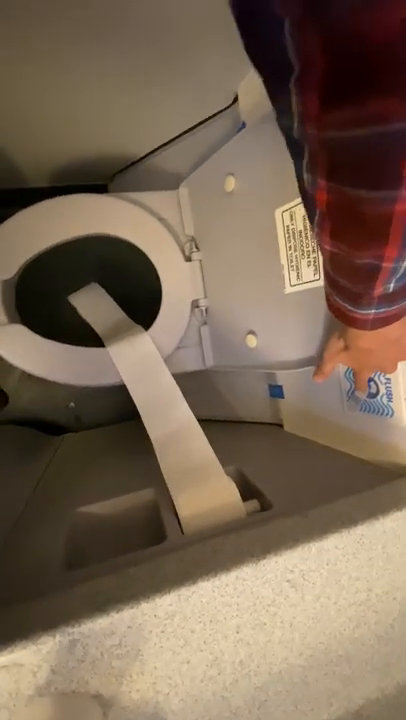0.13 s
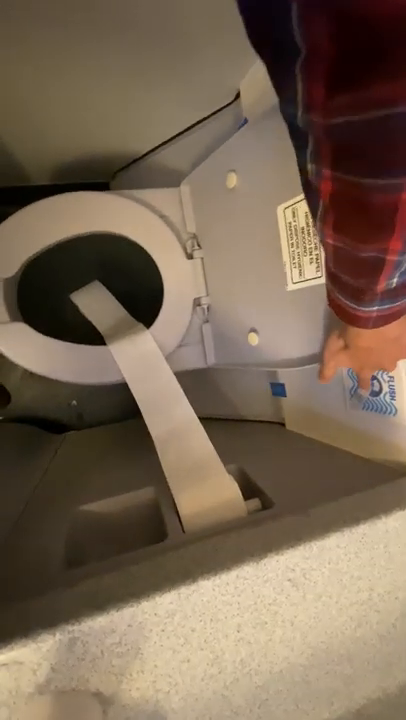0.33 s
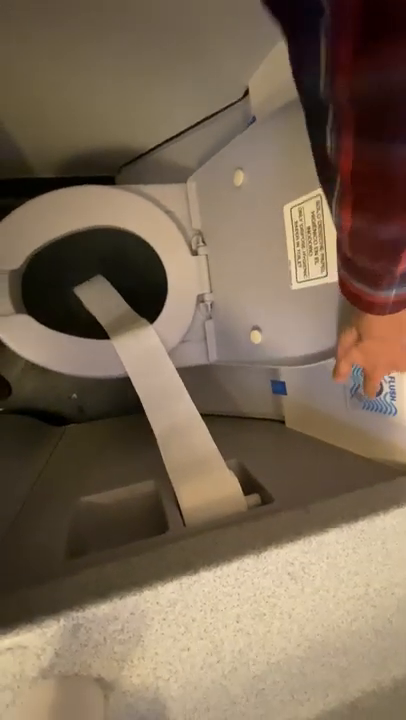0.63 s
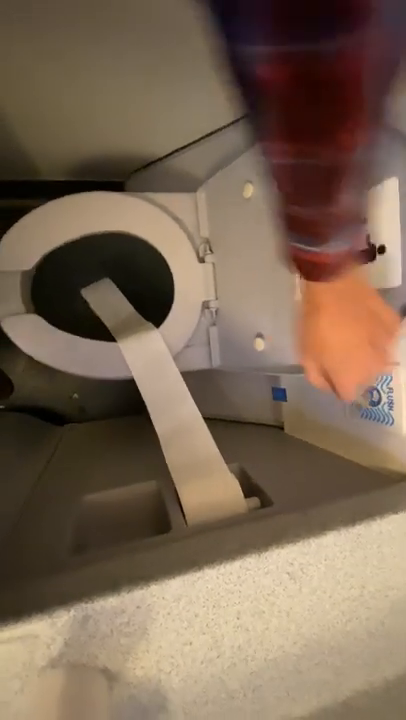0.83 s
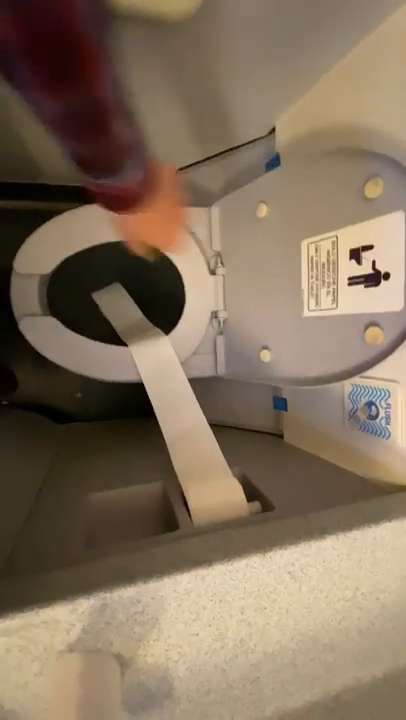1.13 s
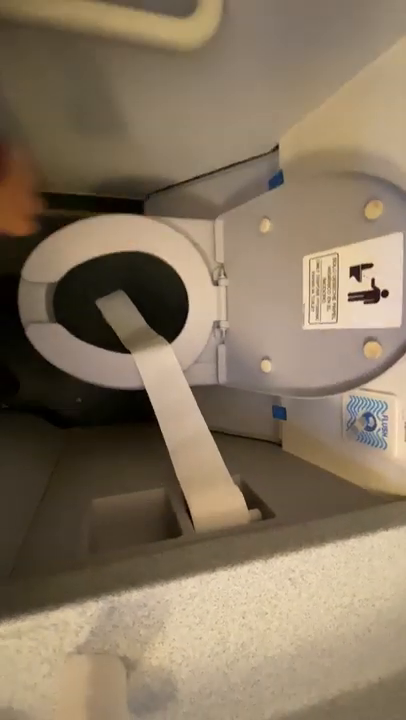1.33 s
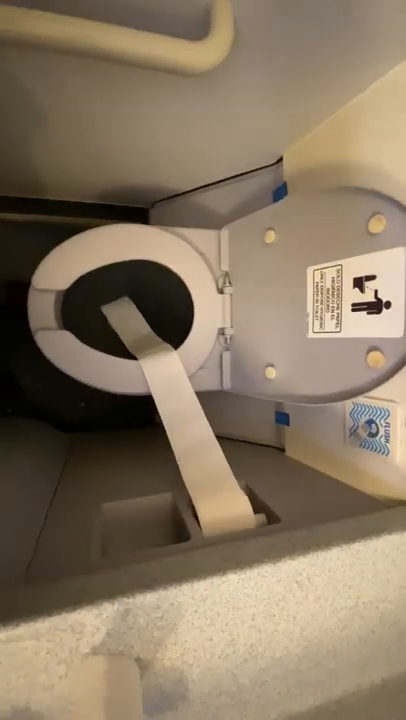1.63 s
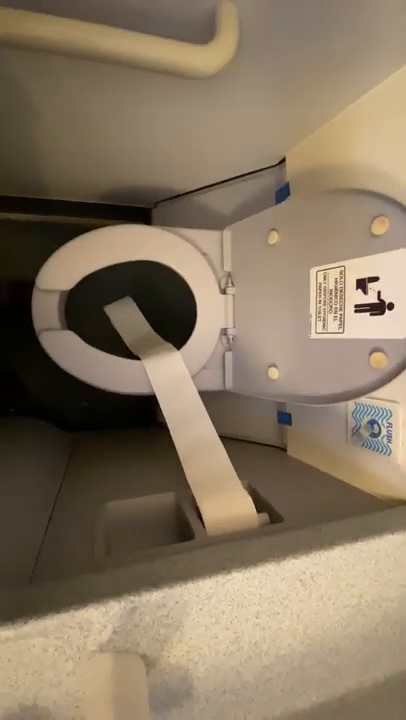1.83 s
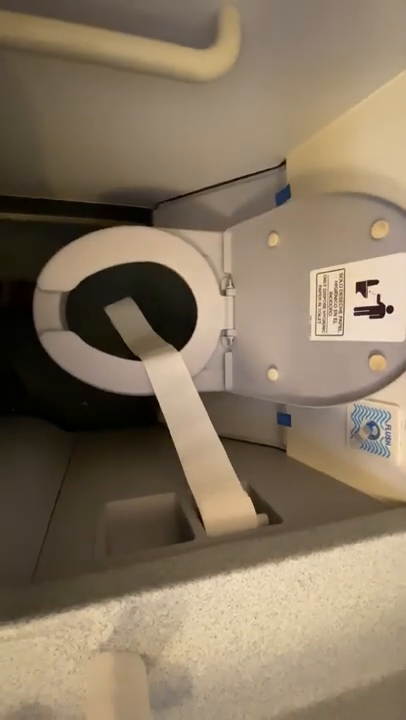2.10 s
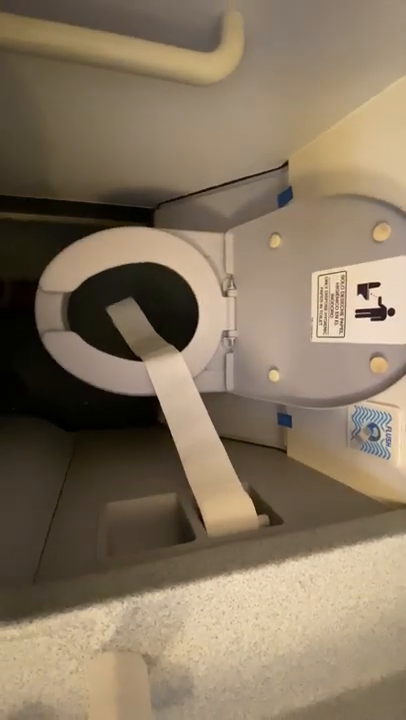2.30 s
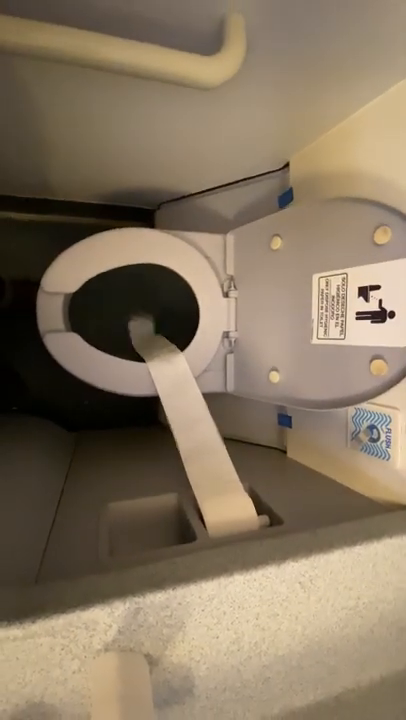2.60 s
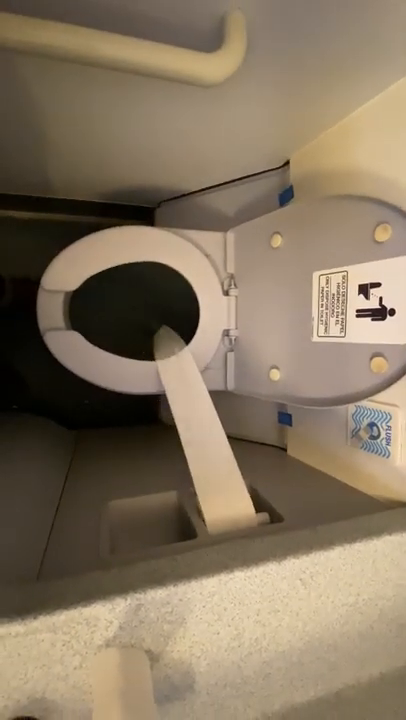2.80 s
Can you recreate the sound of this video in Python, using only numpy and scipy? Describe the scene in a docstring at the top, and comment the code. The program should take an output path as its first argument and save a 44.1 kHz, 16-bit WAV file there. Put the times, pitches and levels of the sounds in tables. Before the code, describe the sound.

Close handheld stereo pickup in a cramped aircraft lavatory; boomy cabin drone runs alone, a soft swish passes, water spits and sprays, then the vacuum toilet bursts into rough, hollow roaring suction until the cut.

```python
"""In a small aircraft lavatory, a vacuum toilet starts to flush over cabin rumble and vent hiss.
The cabin is shaped noise with a wavering fan tone, a swelling drone and a randomly wandering deep rumble.
After a soft swish, faint whistles sound as rinse and drain open; rinse water spits and sprays as noise
bursts and ringing bands. The drain valve hisses through its gap, then suction roars in the resonances of
bowl and cubicle. A gain control ducks the whole mix, so the roar pushes the rumble down."""
import sys
import numpy as np
from scipy import signal
from scipy.fft import rfft, irfft
from scipy.io import wavfile

SR = 44100
rng = np.random.default_rng(int(sys.argv[2]) if len(sys.argv) > 2 else 0)


def put_to_file(sound):
    """Save the sound as 16-bit audio at rate SR, in the file named by the first command-line argument."""
    columns = np.atleast_2d(sound).T  # one column per channel
    safe = np.clip(columns, -1, 1)
    whole_steps = np.round(safe * 32767)
    wavfile.write(sys.argv[1], SR, whole_steps.astype(np.int16))


N = 130095
HZ = np.maximum(np.fft.rfftfreq(N, 1 / SR), 1)
TIME = np.arange(N) / SR


def from_db(db):
    """Decibels to gain."""
    return 10 ** (np.asarray(db) / 20)


def rms_one(x):
    """Scale to rms 1."""
    return x / np.sqrt(np.mean(x ** 2) + 1e-20)


def in_time(rows):
    """The columns of a curve at every sample."""
    start_s, *columns = np.transpose(rows)
    return [np.interp(TIME, start_s, column) for column in columns]


def at_hz(points):
    """A table over frequency, joined on a log axis."""
    hz, value = np.transpose(points)
    return np.interp(np.log(HZ), np.log(hz), value)


def drift(rate_hz):
    """Slow random wander of spread 1: noise that falls away above the rate."""
    spectrum = rfft(rng.standard_normal(N))
    return rms_one(irfft(spectrum / (1 + (HZ / rate_hz) ** 2), N))


def smooth(x, seconds):
    """One-pole lag."""
    keep = np.exp(-1 / (seconds * SR))
    return signal.lfilter([1 - keep], [1, -keep], x)


def burst(start_s, attack_s, t60_s, hold_s=0):
    """A straight rise, a hold and an exponential fall."""
    age = TIME - start_s
    fall_age = np.maximum(age - attack_s - hold_s, 0)
    return np.clip(age / attack_s, 0, 1) * np.exp(-np.log(1000) * fall_age / t60_s)


def shelf(x, split_hz, treble_db):
    """Raise or lower everything above the split."""
    low = irfft(rfft(x) / (1 + (HZ / split_hz) ** 4), N)
    return low + from_db(treble_db) * (x - low)


def at_ports(gain):
    """Noise of the given colour as two microphone ports hear it, partly alike and phase-shifted; rms 1."""
    # how alike the two ports are: hz, coherence (held within 0 to 1)
    likeness = [(60, 1.06), (130, .999), (220, 1.3), (290, 0.45), (400, 0.45), (470, 0.95), (520, 0.55),
                (1000, 0.66), (1900, 0.31), (2800, 0.5265), (4000, 0.04), (5400, 1.2), (7000, 0.4),
                (9000, .5), (10000, 2), (12000, .7), (13500, 1), (15500, .95)]
    # phase between the ports: hz, left_lead_rad
    left_lead = [(250, -2), (430, -1.5), (510, -2), (700, -2.5), (1500, -2), (3000, -3), (4400, -4.5),
                 (5400, -5.5), (6200, -5), (8000, -2), (9800, -0.5), (11000, -0.4), (13000, 3.5),
                 (14300, 1.5), (16000, 6.2)]
    # balance of the ports: hz, left_minus_right_db
    sides = [(110, 0), (200, -1.5), (290, 2), (390, 7.5), (700, 0), (1300, 4), (2400, 0), (5000, -0.8),
             (15000, 0)]
    in_phase_hz = 250  # no phase shift up to here
    shared, own = rfft(rng.standard_normal((2, N)))
    alike = np.clip(at_hz(likeness), 0, 1)
    lag = np.exp(-1j * at_hz(left_lead) * (HZ > in_phase_hz))
    right = alike * lag * shared + np.sqrt(1 - alike ** 2) * own
    pan = from_db(np.outer([.5, -.5], at_hz(sides)))
    pan = pan / np.hypot(*pan)
    return rms_one(irfft(np.array([shared, right]) * gain * pan, N))


def turbulence(spectrum, resonances=(), room=1):
    """Rushing air or water, lifted at the resonances that it excites; rms 1."""
    power = 1
    for hz, width_hz, lift_db in resonances:
        bell = 1 / (1 + (2 * (HZ - hz) / width_hz) ** 2) ** 1.5
        power = power + (from_db(lift_db) ** 2 - 1) * bell
    return at_ports(from_db(at_hz(spectrum)) * np.sqrt(np.abs(power)) * room)


def walls():
    """Dense early reflections from the close walls ripple the treble with fixed narrow peaks and notches."""
    t60_s, treble_share_db, from_hz = 0.086, -2, 1350
    echoes = rfft(rng.standard_normal(N) * np.exp(-np.log(1000) * TIME / t60_s))
    share = from_db(treble_share_db) * HZ / np.hypot(HZ, from_hz)
    return np.abs(1 + share * echoes / np.std(echoes)) / np.hypot(1, share)


def tone(hz, width_hz, steady=False):
    """A narrow, wavering line of noise; a steady one has its level evened out and wavers in pitch only."""
    line = at_ports(1 / (1 + (2 * (HZ - hz) / width_hz) ** 2))
    if not steady:
        return line
    envelope = np.sqrt(np.mean(np.abs(signal.hilbert(line)) ** 2, axis=0))
    return rms_one(line / envelope)


def moving_band(path, width_hz):
    """A resonance in the flow whose centre and level follow rows of start_s, centre_hz, level_db."""
    hz, level_db = in_time(path)
    centre = np.mean(np.array(path)[:, 1])
    turn = np.exp(2j * np.pi * np.cumsum(hz - centre) / SR)  # shifts the band off its mean centre
    return from_db(level_db) * np.real(signal.hilbert(tone(centre, width_hz)) * turn)


def cabin():
    """Airflow booming in the cubicle, a swelling drone, a wandering deep rumble and a wavering fan tone."""
    # cabin rumble and vent air: hz, relative_db_per_hz
    air_spectrum = [(15, -18), (33, -21.5), (46, -9), (90, -6.5), (130, -6), (250, -6.5), (330, -10.5),
                    (460, -14.5), (650, -15), (1000, -17), (1400, -23), (1800, -28.5), (2300, -31),
                    (3000, -36), (4000, -41.5), (4700, -40), (6300, -44.5), (8000, -51), (10500, -56),
                    (15000, -57.5)]
    # the cubicle booms: hz, width_hz, lift_db
    cubicle = [(49, 6.5, 7.5), (69, 11.2, 4.5), (104.8, 10.4, 7), (143.4, 8.6, 10), (163.5, 10.5, 3.5),
               (214, 20, 7), (243, 26, 4), (283.6, 6.6, 4), (359.2, 22.4, 8.5), (397, 43, 8.5),
               (427, 18, 9), (524.7, 17.6, 6.5), (635, 35, 4), (715, 12, 6.5), (813, 38, 4), (964, 70, 1.5),
               (1224, 30, 4.5), (1490, 55, 3.5), (2400, 27, -7)]
    # the air's treble lifts very slightly around 1.35 s and settles back: start_s, treble_db
    air_treble = [(0, -0.5), (.95, -0.5), (1.35, 0.1), (2, -0.5)]
    # the fan tone swells and fades: start_s, swell_db
    fan_swell = [(0, 2), (.15, -4), (.28, 3), (.53, -5), (.7, 3), (1.05, -6), (2.95, -4)]
    # a strong boom of the cubicle drones, swelling and fading: start_s, level_db
    drone_swell = [(0, -16), (.2, -30.5), (.27, -17.5), (.33, -27), (.56, -22.5), (.66, -18), (.77, -19.5),
                   (.83, -27.5), (1.1, -26.5), (1.19, -19), (1.3, -26), (1.6, -22.5), (2.24, -37),
                   (2.33, -18), (2.42, -22.5), (2.56, -26), (2.64, -16.5), (2.72, -23.5)]
    # level of the deep 70 Hz rumble, wandering at random: start_s, level_db
    rumble_wander = [(0, -31), (.4, -30), (.6, -25.5), (1.03, -34), (1.15, -23.5), (1.5, -23), (1.75, -31),
                     (1.95, -27), (2.0, -24), (2.25, -21), (2.6, -33)]
    air_db, fan_db, split_hz = -16, -28.5, 2200
    ripple_share = 0.56  # share of the wall ripple, in decibels
    treble_db, = in_time(air_treble)
    swell_db, = in_time(fan_swell)
    drone_db, = in_time(drone_swell)
    rumble_db, = in_time(rumble_wander)
    air = shelf(turbulence(air_spectrum, cubicle, walls() ** ripple_share), split_hz, treble_db)
    fan = from_db(fan_db + swell_db) * tone(407.6, width_hz=4.8, steady=True)
    drone = from_db(drone_db) * tone(158.5, width_hz=21.7, steady=True)
    rumble = from_db(rumble_db) * tone(70.3, width_hz=14, steady=True)
    return from_db(air_db) * air + fan + drone + rumble


def swish():
    """One short, soft hiss before the flush: shaped noise with a quick rise and a dying tail."""
    # colour of the swish: hz, relative_db_per_hz
    swish_spectrum = [(1200, -20), (2500, -11), (3600, 6.5), (5300, 4), (7500, -8), (11000, -19),
                      (15000, -26)]
    level_db = -32.5
    envelope = burst(1.69, attack_s=0.017, t60_s=0.21)
    return from_db(level_db) * envelope * turbulence(swish_spectrum)


def whistles():
    """Faint, narrow, wavering lines in the plumbing as rinse and drain open; two of them climb in pitch."""
    # each whistle: start_s, length_s, pitch_hz, glide_hz_per_s, level_db
    whistle_rows = [(1.962, 0.09, 1006, 300, -30), (2.067, 0.046, 5280, 0, -40),
                    (2.072, 0.065, 1507, 4505, -36), (2.085, 0.036, 848, 0, -25.5),
                    (2.172, 0.015, 6370, 0, -35), (2.577, 0.06, 2525, 0, -36)]
    spread_hz, attack_s, t60_s = 23, 0.0029, 0.054
    out = 0
    for start_s, length_s, hz, glide, level_db in whistle_rows:
        turn = np.exp(1j * np.pi * glide * (TIME - start_s) ** 2)
        line = np.real(signal.hilbert(tone(hz, spread_hz)) * turn)
        out = out + from_db(level_db) * burst(start_s, attack_s, t60_s, length_s) * line
    return out


def rinse():
    """The nozzles spit as they clear, ringing higher as they fill, then spray the bowl with a fine spatter."""
    # spits of air and water: start_s, level_db, treble_db
    spit_rows = [(2.069, -18.5, -11), (2.08, -22.5, 0.5), (2.108, -20, -28), (2.121, -24.5, 0),
                 (2.173, -23, 6), (2.204, -26.5, 7)]
    # colour of a spit: hz, relative_db_per_hz
    spit_spectrum = [(250, 7), (450, 9.5), (900, -22), (1600, -3), (2600, 1), (4000, -3.5), (6300, -4),
                     (8000, -10), (12000, -18.5), (15500, -31)]
    # flow of the rinse spray: start_s, level_db
    spray_flow = [(2.06, -80), (2.085, -33), (2.12, -44), (2.16, -28), (2.21, -29.5), (2.25, -30.5),
                  (2.3, -29.5), (2.41, -33), (2.48, -37), (2.575, -45), (2.62, -26), (2.7, -22.5),
                  (2.75, -24), (2.785, -32), (2.84, -26), (2.95, -23.5)]
    # colour of the spray: hz, relative_db_per_hz
    spray_spectrum = [(600, -20), (1800, 1), (2800, 4), (3700, -1.5), (5500, 1.5), (7500, -1.5),
                      (10000, -5.5), (12500, -8), (15500, -8)]
    # resonances of nozzles and bowl: hz, width_hz, lift_db
    water_rings = [(2200, 59, 8.5), (6260, 190, -1.5)]
    # the resonance of the filling nozzles: start_s, centre_hz, level_db
    nozzle_ring = [(2.06, 2200, -90), (2.073, 2200, -36), (2.09, 2200, -36), (2.1, 2200, -38),
                   (2.115, 2220, -34), (2.14, 2650, -34.5), (2.18, 3060, -36), (2.22, 2900, -33),
                   (2.25, 2900, -48), (2.5, 3300, -50), (2.6, 3300, -88)]
    spit_attack_s, spit_t60_s, spit_split_hz = 0.0029, 0.16, 2900
    rough_db, rough_hz = 1, 120
    flow_db, = in_time(spray_flow)
    room = walls()
    spray = from_db(flow_db) * turbulence(spray_spectrum, water_rings, room)
    water = spray + moving_band(nozzle_ring, width_hz=410)
    for start_s, level_db, treble_db in spit_rows:
        spit = shelf(turbulence(spit_spectrum, water_rings, room), spit_split_hz, treble_db)
        water = water + from_db(level_db) * burst(start_s, spit_attack_s, spit_t60_s) * spit
    return water * from_db(rough_db * drift(rough_hz))


def valve():
    """Air hisses through the widening gap of the drain valve, whose broad resonance sinks and climbs."""
    # air drawn through the opening valve: start_s, level_db
    valve_flow = [(2.47, -61), (2.525, -33), (2.58, -30), (2.65, -30.5), (2.7, -22.5), (2.75, -24),
                  (2.79, -26), (2.86, -18), (2.95, -21)]
    # colour of the hiss: hz, relative_db_per_hz
    hiss_spectrum = [(700, -10), (1500, 10.5), (2300, -3), (2650, 0), (3000, -7), (3500, -1.5), (3900, 1.5),
                     (5200, 3.5), (6000, 1), (7000, -7), (9500, -12), (15500, -15)]
    # whistling resonances in the hiss: hz, width_hz, lift_db
    hiss_rings = [(2566, 60, 8.5), (3950, 40, 4), (6600, 100, 5), (7600, 120, 4)]
    # the resonance of the gap: start_s, centre_hz, level_db (relative to the hiss)
    gap_ring = [(2.52, 5140, -5), (2.565, 5596, -4.5), (2.6, 5150, -10), (2.65, 4850, 0), (2.69, 5395, -6),
                (2.76, 5100, -13), (2.83, 4830, -8), (2.88, 5320, -8.5), (2.95, 5500, -4)]
    rough_db, rough_hz = 1.1, 40
    flow_db, = in_time(valve_flow)
    hiss = turbulence(hiss_spectrum, hiss_rings, walls()) + moving_band(gap_ring, width_hz=1000)
    return from_db(flow_db + rough_db * drift(rough_hz)) * hiss


def suction():
    """The vacuum tears the water down in slugs; the rough roar rings in the bowl as its treble swings."""
    # the suction as the drain opens: start_s, level_db, treble_db
    suction_flow = [(2.56, -63, -3), (2.655, -21, -4), (2.685, -15.5, 5), (2.715, -7.5, 3.5),
                    (2.735, -3, 1.5), (2.757, -3, -1), (2.777, -5, -11), (2.835, -8, -7), (2.855, -4.5, -4),
                    (2.875, -7.5, 0), (2.92, -4.5, -1), (2.95, -5, -4)]
    # colour of the roar: hz, relative_db_per_hz
    roar_spectrum = [(90, -16), (180, -1), (280, 2), (600, -2), (800, 1), (1100, 0.5), (1550, -2.5),
                     (1900, -6), (2550, -12.5), (2950, -22), (3400, -14), (6000, -37), (12000, -49)]
    # bowl and cubicle ring with it: hz, width_hz, lift_db
    bowl = [(210.5, 22, 15), (382.5, 28, 14), (505, 16, 12), (718, 22, 9.5), (864, 47, 12), (1040, 23, 5),
            (1224, 39, 9), (1394, 35, 7), (1480, 24, 4), (1550, 18, 4), (1533, 20, 10), (1850, 22, 6),
            (2140, 30, 10), (2297, 30, 4), (2530, 30, 9), (2840, 24, 18)]
    # slugs of water hit the drain, each with a short hollow knock: start_s, pitch_hz, level_db
    slugs = [(2.695, 1540, -20), (2.707, 850, -13), (2.713, 1480, -10), (2.717, 2200, -15),
             (2.726, 810, -5), (2.741, 1520, -8), (2.757, 920, -10), (2.758, 204.2, -5), (2.806, 388, -9),
             (2.85, 870, -14.5), (2.881, 1246, -6.5), (2.918, 870, -9)]
    split_hz, rough_db, rough_hz = 1200, 1, 130
    slug_attack_s, slug_t60_s, slug_width_share = 0.003, 0.091, 0.12  # width as a share of pitch
    flow_db, treble_db = in_time(suction_flow)
    roar = from_db(flow_db) * shelf(turbulence(roar_spectrum, bowl), split_hz, treble_db)
    for start_s, hz, level_db in slugs:
        knock = burst(start_s, slug_attack_s, slug_t60_s) * tone(hz, slug_width_share * hz, steady=True)
        roar = roar + from_db(level_db) * knock
    return roar * from_db(rough_db * drift(rough_hz))


def scene():
    """The flush over the cabin noise."""
    return cabin() + swish() + whistles() + rinse() + valve() + suction()


def record(dry):
    """Gain control ducks what passes the limit and lets go slowly; peaks are rounded and the top is cut."""
    limit_db, sense_s, attack_s, release_db_per_s = -12.5, 0.03, 0.021, 11
    cutoff_hz = 15800
    power = smooth(np.mean(dry ** 2, axis=0), sense_s)
    level_db = 10 * np.log10(power + 1e-12)
    # the deepest cut so far, let go at the release rate
    fall = release_db_per_s * TIME
    excess_db = np.maximum(level_db - limit_db, 0)
    cut_db = np.maximum.accumulate(excess_db + fall) - fall
    held = dry * from_db(-smooth(cut_db, attack_s))
    rounded = held / (1 + held ** 8) ** (1 / 8)
    eased = rounded * np.minimum(TIME / .003, 1)  # 3 ms fade-in
    top_cut = signal.cheby1(14, .1, cutoff_hz, fs=SR, output="sos")
    return signal.sosfilt(top_cut, eased)


dry = scene()
out = record(dry)
put_to_file(out)
```